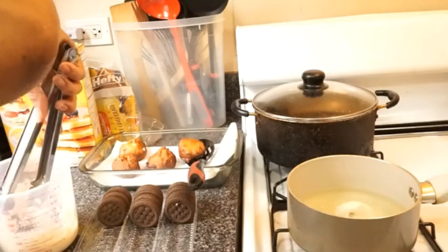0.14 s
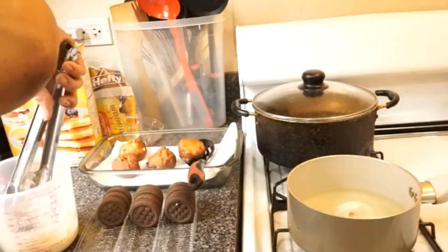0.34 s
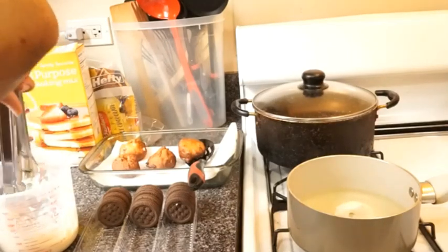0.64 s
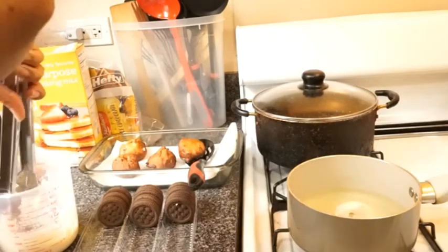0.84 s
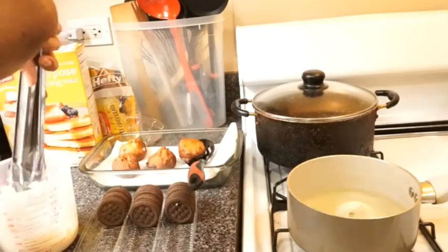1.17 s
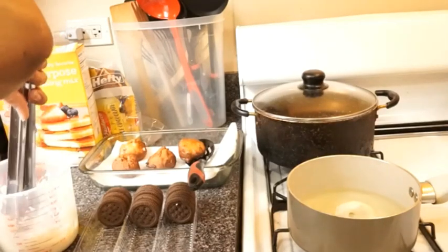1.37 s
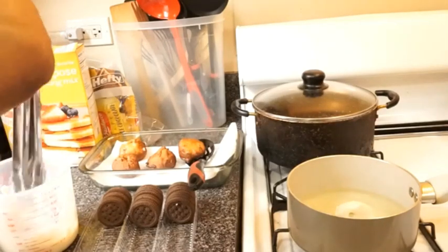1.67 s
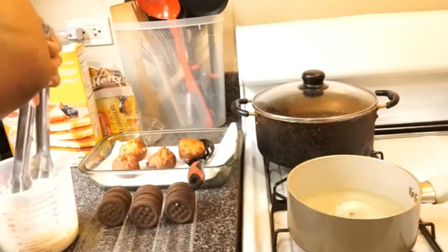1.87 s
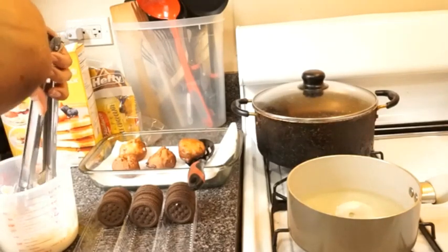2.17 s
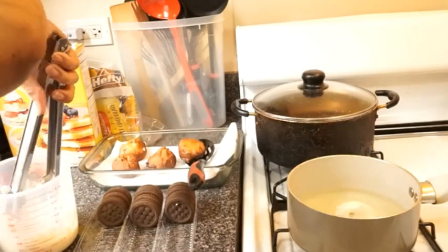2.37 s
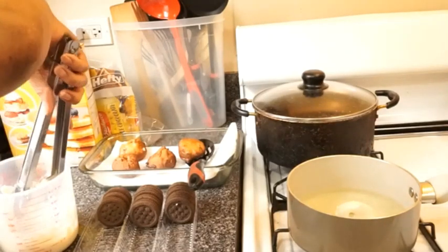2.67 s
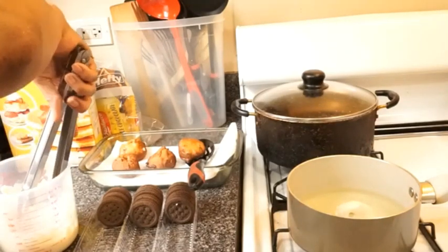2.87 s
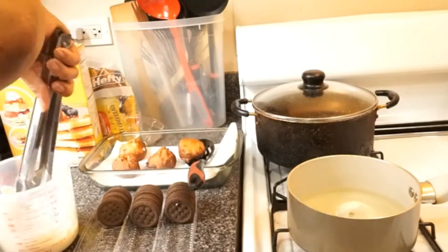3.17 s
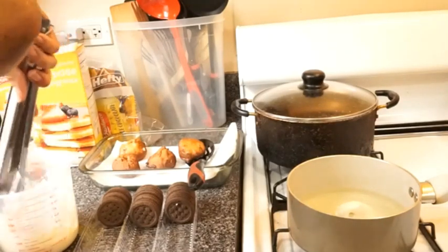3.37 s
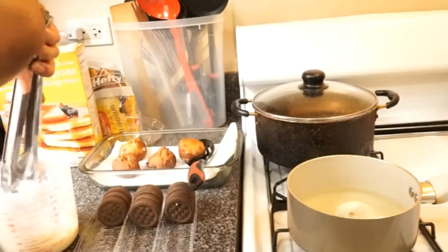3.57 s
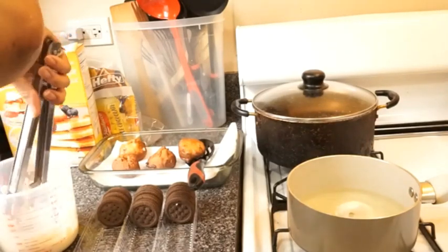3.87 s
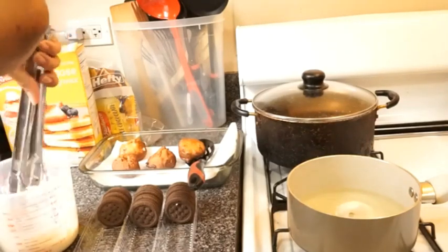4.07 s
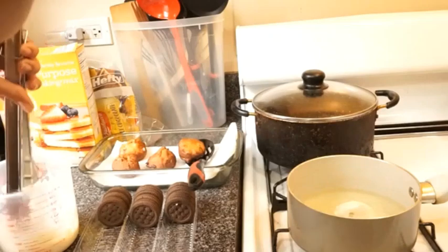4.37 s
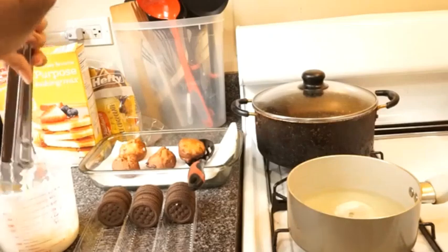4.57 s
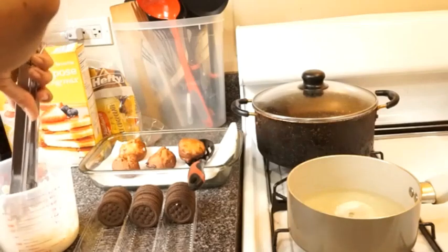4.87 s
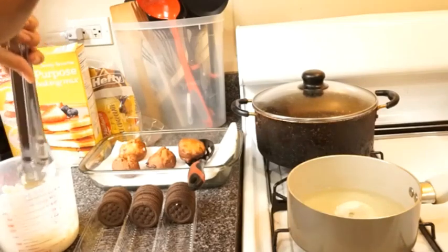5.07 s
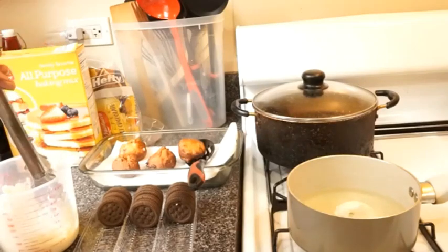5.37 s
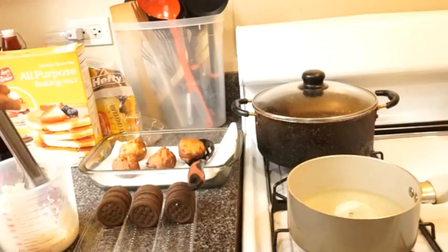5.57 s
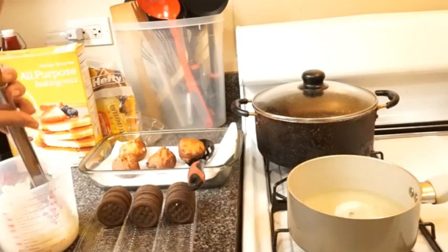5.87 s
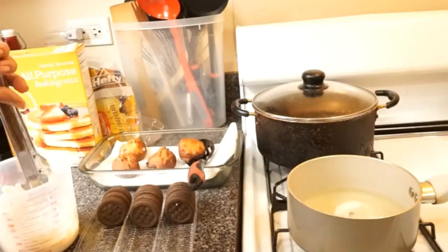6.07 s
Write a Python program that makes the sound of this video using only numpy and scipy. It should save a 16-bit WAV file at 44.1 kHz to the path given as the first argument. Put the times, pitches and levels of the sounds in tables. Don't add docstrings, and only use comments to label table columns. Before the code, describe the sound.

Steel tongs click sharply and knock hollowly against a plastic cup in uneven bursts, over a faint oil hiss in a small kitchen.

```python
import sys
import numpy as np
from scipy import signal
from scipy.fft import rfft, irfft
from scipy.io import wavfile
from scipy.ndimage import uniform_filter1d

SR = 44100
rng = np.random.default_rng(int(sys.argv[2]) if len(sys.argv) > 2 else 0)


def transcribe(u):
    v = np.clip(np.atleast_2d(u).T, -1, 1)
    q = np.round(v * 32767).astype(np.int16)
    wavfile.write(sys.argv[1], SR, q)


def ratio_of_db(decibels):
    return 10 ** (np.asarray(decibels, float) / 20)


N = 274008
RING = SR // 5

# f/Hz, level/dB
CUP_MODES = [(262, -12.5), (320, -10), (366, -8.5), (420, -3), (470, -10.5), (583, 2), (645, -0.5),
             (727, 11), (772, 2), (866, -10), (935, 14.5), (1035, 4.5), (1085, 2), (1156, 4), (1224, 5),
             (1290, -16.5), (1351, 5.5)]
# f/Hz, level/dB
TONG_MODES = [(1640, -1.5), (1840, -12), (1945, 1.5), (2046, 3.5), (2257, -1.5), (2335, 4), (2490, -1.5),
              (2680, -3.5), (2780, 3.5), (2993, 7.5), (3114, -4.5), (3283, 2.5), (3600, 0), (3900, -4),
              (4250, -22.5), (4440, 0), (4720, -0.5), (5010, -11), (5315, 2), (5520, -19), (5890, -4),
              (6220, 0), (6570, -11), (6900, -2), (7390, -1.5), (8150, 2.5), (8840, -3), (9300, -1),
              (9840, -4), (10700, 0.5)]
TONG_PARTS_HZ = [3400, 7000]


def rms_one(x):
    return x / np.sqrt(np.mean(x ** 2) + 1e-20)


def in_time(rows, outside=None):
    s, *columns = np.transpose(rows)
    return [np.interp(np.arange(N) / SR, s, c, outside, outside) for c in columns]


def at_hz(points, hz):
    point_hz, db = np.array(points).T[:2]
    return np.interp(np.log(hz), np.log(point_hz), db)


def drift(rate):
    coarse = 40
    r = np.exp(-2 * coarse * np.pi * rate / SR)
    noise = rng.standard_normal(N // coarse + 2002)
    slow = signal.lfilter([1], [1, -2 * r, r * r], noise)[2000:]
    return np.interp(np.arange(N) / coarse, np.arange(len(slow)), rms_one(slow))


def band(x, low_hz, high_hz):
    return signal.sosfilt(signal.butter(2, [low_hz, high_hz], "band", fs=SR, output="sos"), x)


def resonance(x, hz, width_hz):
    r = np.exp(-np.pi * width_hz / SR)
    top, bottom = [(1 - r * r) / 2, 0, (r * r - 1) / 2], [1, -2 * r * np.cos(2 * np.pi * hz / SR), r * r]
    return signal.lfilter(top, bottom, x)


def mode_rings(modes, t60):
    hz, db = np.transpose(modes)[:, :, None]
    t = np.arange(RING) / SR
    decay_db = 60 * t / t60 * (hz / hz.min()) ** 0.69
    return ratio_of_db(db - db.max() - decay_db) * np.sin(2 * np.pi * hz * t)


def blow(rings, weights, chatter_s):
    out = np.zeros(RING + SR // 10)
    for k, (when, size) in enumerate(rng.random((5, 2))):
        at = int(np.clip(when * chatter_s, 0, .09) * SR) * (k > 0)
        uneven = ratio_of_db(2.4 * rng.standard_normal(len(rings))) * rng.choice([-1, 1], len(rings))
        force = 1 if k == 0 else 1.07 * size
        out[at:at + RING] += (weights * uneven) @ rings * force
    return out / (np.abs(out).max() + 1e-20)


def crack(low_hz, high_hz):
    t60_s = 0.013
    fading = rng.standard_normal(RING) * ratio_of_db(-60 * np.arange(RING) / SR / t60_s)
    burst = band(fading, low_hz, high_hz)
    return burst / np.abs(burst).max()


def add(track, s, sound):
    at = max(round(s * SR), 0)
    track[at:at + len(sound)] += sound[:N - at]


def banded(excite, spectrum, lowest_hz, patchy_db):
    # f/Hz, likeness/1
    likeness = [(60, 0.08), (140, 0.95), (350, 0.65), (830, 0.35), (2000, 0.18), (4810, 0.024),
                (11600, 0.011)]
    out, edges = 0, lowest_hz * 2 ** (np.arange(13) / 3)
    for k, (low, high) in enumerate(zip(edges, edges[1:])):
        mid, side = band(excite[k % 2], low, high)
        hz = np.sqrt(low * high)
        alike = np.clip(at_hz(likeness, hz), -1, 1)
        gain = ratio_of_db(at_hz(spectrum, hz) + patchy_db * drift(8.2))
        stereo = np.sqrt(1 + alike) * mid + np.sqrt(1 - alike) * side * [[1], [-1]]
        out = out + gain * stereo
    return rms_one(out)


def oil():
    # t/s, level/dB
    vigour = [
        (0, -51.5),
        (1.5, -51),
        (2.8, -49),
        (3.5, -50),
        (4.5, -49),
        (5.3, -50),
        (5.9, -48),
        (6.21, -48.5),
    ]
    # f/Hz, density/(dB per Hz)
    hiss = [(410, -37), (700, -13), (823, -9), (913, 1.5), (1430, -8), (1790, 1), (2220, -6.5),
            (2680, -2.5), (3180, -4), (4560, -1), (11100, -8.5), (14400, -41), (22000, -120)]
    # f/Hz, width/Hz, level/dB
    pot_modes = [(900, 21, -19.5), (1227, 30, -17.5), (1855, 110, -13), (2682, 79, -14.5),
                 (3534, 25, -16.5), (4330, 77, -17.5), (5110, 11, -17)]
    bursts = (rng.random(N) < 3000 / SR) * rng.exponential(1, N)
    fizz = rng.standard_normal((2, 2, N)) * (1 + 0.32 * bursts)
    inner = rng.standard_normal(N) + .5 * rng.standard_normal((2, N))
    pot = sum(ratio_of_db(db) * rms_one(resonance(inner, hz, width_hz)) for hz, width_hz, db in pot_modes)
    return ratio_of_db(in_time(vigour)[0]) * rms_one(banded(fizz, hiss, 731, patchy_db=0.2) + pot)


def hum():
    # t/s, level/dB
    roar = [
        (0, -56),
        (.4, -66.5),
        (2.5, -62.5),
        (4.2, -65),
        (5, -61.5),
        (6.21, -61.5),
    ]
    # f/Hz, density/(dB per Hz)
    colour = [(35, -81), (60, -40), (227, -2), (277, -3), (308, -6), (562, -4.5), (589, 2.5), (1000, -12),
              (1300, -33), (2200, -120)]
    return ratio_of_db(in_time(roar)[0]) * banded(rng.standard_normal((2, 2, N)), colour, 62.1, patchy_db=4.0)


def knocks():
    # t/s, wall tone peak level/dB, wall tone f/Hz, base level/dB, upper wall level/dB
    hard_knocks = [(0.004, -48, 856, -52.5, -54.5), (0.225, -38, 670, -70, -41.5),
                   (0.712, -44.5, 650, -43, -42.5), (1.733, -31, 772, -43.5, -34),
                   (1.741, -44, 760, -40, -44.5), (2.045, -40.5, 740, -46.5, -56),
                   (2.738, -27.5, 724, -57, -45), (2.89, -23, 711, -44, -40),
                   (3.356, -40.5, 773, -38.5, -39.5), (3.804, -40.5, 734, -48, -43.5),
                   (3.83, -48, 770, -42, -51), (4.292, -37, 910, -33, -34.5), (4.299, -29, 763, -38.5, -27),
                   (4.303, -29.5, 720, -37, -39), (4.69, -40, 712, -40.5, -47),
                   (5.19, -40.5, 900, -63, -44.5), (5.668, -33.5, 799, -43, -35),
                   (5.867, -44, 754, -62, -58)]
    # t/s, peak level/dB, f/Hz
    light_bumps = [(1.222, -35.5, 732), (1.239, -42, 753), (1.255, -31, 694), (1.269, -45, 611),
                   (1.301, -50, 710), (1.333, -46.5, 562), (2.757, -42, 757), (2.779, -44, 730),
                   (2.867, -31.5, 720), (2.9, -26.5, 755), (4.842, -40.5, 667)]
    chatter_s, wall_t60_s, cup_t60_s = 0.006137, 0.053, 0.037
    out, rings = np.zeros(N), mode_rings(CUP_MODES, cup_t60_s)
    part = np.digitize(np.array(CUP_MODES)[:, 0], [500, 900])
    t = np.arange(RING) / SR
    bumps = [(s, db, hz, db - 23, db - 16) for s, db, hz in light_bumps]
    for s, peak_db, hz, base_db, upper_db in [*hard_knocks, *bumps]:
        wall = ratio_of_db(-60 * t / wall_t60_s) * np.sin(2 * np.pi * hz * t)
        wall_weights = np.r_[1, .55 * (part == 1)]
        add(out, s, ratio_of_db(peak_db - 3.5) * blow(np.vstack([wall, rings]), wall_weights, chatter_s))
        add(out, s, ratio_of_db(peak_db - 10) * crack(477, 970))
        add(out, s + 0.00282, ratio_of_db(base_db - 1.0) * blow(rings, part == 0, 2 * chatter_s))
        add(out, s + 0.00278, ratio_of_db(base_db - 1.5) * crack(256, 580))
        add(out, s, ratio_of_db(upper_db + 4.5) * blow(rings, part == 2, chatter_s))
        add(out, s, ratio_of_db(upper_db) * crack(840, 1330))
    return band(out, 237, 3100)


def drags():
    # start t/s, top t/s, end t/s, cup level/dB, steel level/dB
    strokes = [
        (0.158, .16, .2, -57, -69),
        (1.4, 1.42, 1.39, -58, -59),
        (2.252, 2.34, 2.37, -56.5, -66),
        (2.815, 2.884, 2.885, -44, -47),
        (2.865, 2.909, 3.024, -41, -34),
        (3.122, 3.21, 3.235, -49.5, -49),
        (4.249, 4.289, 4.292, -49, -43),
        (4.788, 4.833, 4.77, -52, -53),
        (5.063, 5.07, 5.24, -64.5, -63),
    ]
    # t/s, level/dB
    sing = [
        (3.14, -59),
        (3.16, -53),
        (3.22, -48),
        (3.27, -64),
    ]
    faint_db, silent_db, sing_width_hz = -65, -200, 70
    ends = (faint_db, faint_db)
    swells = [in_time([(start, *ends), (top, cup_db, steel_db), (end, *ends)], silent_db)
              for start, top, end, cup_db, steel_db in strokes]
    cup, steel = ratio_of_db(np.max(swells, axis=0))
    levels = [cup] + [steel * ratio_of_db(db) for db in [-0.5, 3.5, -2.5]]
    tong_modes = np.array(TONG_MODES)
    tong_part = np.digitize(tong_modes[:, 0], TONG_PARTS_HZ)
    parts = [CUP_MODES] + [tong_modes[tong_part == k] for k in range(3)]
    slipping = rng.random(N) < 1300 * ratio_of_db(2.5 * drift(30)) / SR
    slips = slipping * ratio_of_db(3.4 * np.minimum(rng.exponential(1, N), 4))
    song = sum(resonance(slips + 1e-18, hz, sing_width_hz) for hz in [3680, 2830])
    out = ratio_of_db(in_time(sing, silent_db)[0]) * rms_one(song)
    for modes, level in zip(parts, levels):
        rung = 0
        for hz, db in modes:
            dealt = slips * rng.standard_normal(N) + 1e-18
            rung = rung + ratio_of_db(db) * rms_one(resonance(dealt, hz, 40 + 0.043 * hz))
        out = out + level * rms_one(rung)
    return out


def clicks():
    # t/s, favoured modes' peak level/dB, their f/Hz, whole tool
    # level/dB, tilt arm to hinge/dB
    strikes = [(0.2242, -19.5, 2870, -45, 12), (0.2314, -22, 2740, -38, 2), (0.7112, -32.5, 2070, -60, -11),
               (1.1097, -36, 2280, -40.5, -5), (1.7337, -19.5, 3820, -39.5, -6.5),
               (1.74, -31, 5300, -53, -9), (1.7616, -29, 3500, -53, -9), (2.7393, -38, 2830, -43, 0),
               (2.8643, -30, 2510, -49, 6), (2.886, -16, 2530, -31, 1.5), (2.9135, -24, 2480, -37, -3),
               (2.9323, -15.5, 3720, -44, -2), (3.3553, -37, 2060, -46, -0.5),
               (3.8043, -31, 2830, -43.5, -1.5), (4.2912, -21, 3330, -32, 3),
               (4.2949, -13, 2780, -22, -3.5), (4.3022, -13.5, 1930, -26, -6.5),
               (4.3106, -18, 2950, -37, -8), (5.1847, -38, 2740, -49, -9.5), (5.667, -25.5, 2700, -52, -13),
               (5.858, -29, 2760, -46, 1), (5.8688, -18, 2670, -38, -3),
               (0.9094, -36.5, 3060, -48, 4), (1.1845, -21, 6550, -46, 0), (1.192, -27, 7000, -47, 5),
             (1.4098, -36, 7390, -52.5, 13), (2.9002, -12, 5250, -37, -3), (3.672, -17.5, 9500, -55, 20),
             (4.376, -12, 6400, -28.5, 7.5), (4.3824, -16, 7440, -39, 5), (4.6895, -19, 6000, -40, 1),
             (4.6942, -17.5, 5720, -36.5, -5), (4.841, -24, 5530, -41, 0), (4.847, -16.5, 6640, -36, 3),
             (5.8694, -21, 4550, -39, 0.5), (5.1855, -33, 4100, -53, -8)]
    # t/s, level of these modes and of the whole tool/dB
    touches = [
        (1.22, -44),
        (1.2514, -46.5),
        (2.0457, -47.5),
        (5.0718, -47),
    ]
    tip_lift_db, tong_t60_s = 2.5, 0.026
    out, rings = np.zeros(N), mode_rings(TONG_MODES, tong_t60_s)
    mode_hz, edges = np.array(TONG_MODES)[:, 0], [1400, *TONG_PARTS_HZ, 13000]
    part = np.digitize(mode_hz, TONG_PARTS_HZ)
    ticks = [(s, db, 2000, db, 0) for s, db in touches]
    for s, peak_db, hz, tool_db, tilt_db in [*strikes, *ticks]:
        near = np.exp(-(np.log2(mode_hz / hz) / 0.11) ** 2)
        s += .0008
        add(out, s, ratio_of_db(peak_db - 9.0) * blow(rings, near, 0.0069))
        add(out, s, ratio_of_db(peak_db - 22.5) * crack(hz / 1.09, hz * 1.23))
        for k, db in enumerate([tool_db - tilt_db, tool_db + tip_lift_db, tool_db + tilt_db]):
            add(out, s, ratio_of_db(db + 2.0) * blow(rings, part == k, 0.0096))
            add(out, s, ratio_of_db(db + 2.5) * crack(edges[k], edges[k + 1]))
    return out


def kitchen(x):
    bass_t60_s, treble_t60_s, early_t60_s, split_hz = 0.28, 0.23, 0.042, 1980
    t = np.arange(SR // 2) / SR
    both, own = rng.standard_normal(len(t)), rng.standard_normal((2, 2, len(t)))
    bass = band(both + 0.53 * own[0], 146, split_hz) * ratio_of_db(-60 * t / bass_t60_s)
    treble = band(0.18 * both + own[1], split_hz, 15500) * ratio_of_db(-60 * t / treble_t60_s)
    echoes = (bass + 1.075 * treble) * np.clip((t - .002) / 0.0023, 0, 1)
    echoes = echoes * (1 + 2.17 * ratio_of_db(-60 * t / early_t60_s))
    tone = rfft(echoes)
    near_hz, wide_hz = [uniform_filter1d(np.abs(tone) ** 2, size=k, axis=1) for k in (12, 400)]
    echoes = irfft(tone * np.sqrt(wide_hz / (near_hz + 1e-12)))[:, :SR // 3]
    echoes = echoes * np.clip(t[:SR // 3] / .002, 0, 1)
    return signal.fftconvolve(x[None], echoes / np.sqrt(np.sum(echoes ** 2) / 2), axes=1)[:, :N]


def scene():
    kitchen_db = -2
    cup, steel = knocks() + drags(), clicks()
    near = cup * ratio_of_db(np.array([[1.8], [-1.8]])) + steel * ratio_of_db(np.array([[-.3], [.3]]))
    near[1, 2:] = 0.55 * near[1, :-2] + 0.25 * near[1, 2:]
    return near + ratio_of_db(kitchen_db) * kitchen(cup + steel) + oil() + hum()


def top_cut(x):
    return signal.sosfilt(signal.butter(12, 12150, fs=SR, output="sos"), x)


def record(dry):
    thin = signal.sosfilt(signal.butter(3, 150, "high", fs=SR, output="sos"), dry)
    cut = signal.sosfilt(signal.ellip(9, 1, 48, 11110, fs=SR, output="sos"), thin)
    return top_cut(cut)


dry = scene()
out = record(dry)
transcribe(out)
```